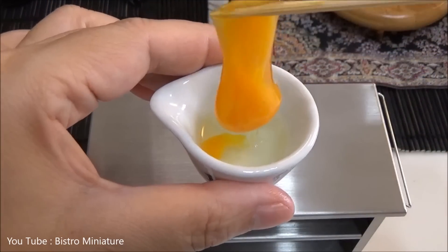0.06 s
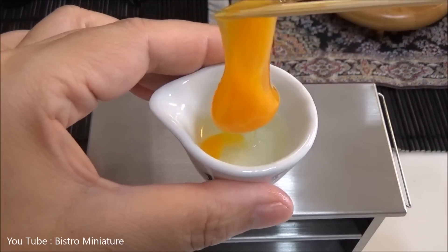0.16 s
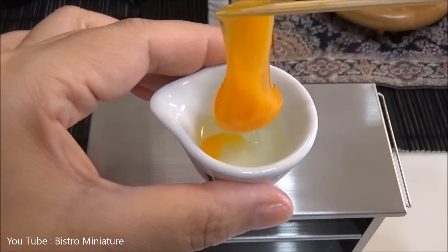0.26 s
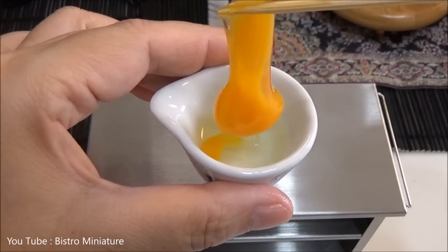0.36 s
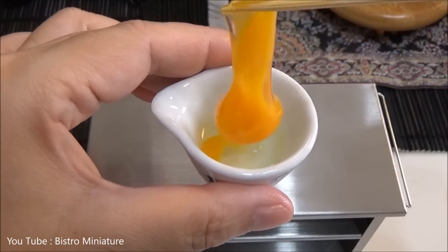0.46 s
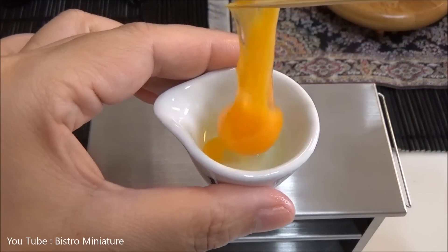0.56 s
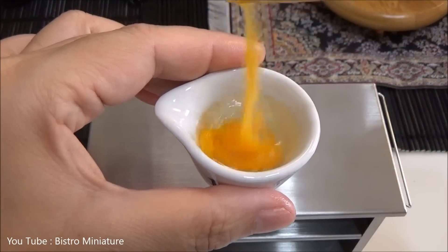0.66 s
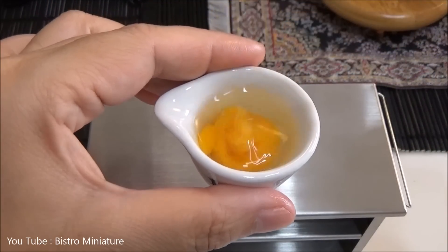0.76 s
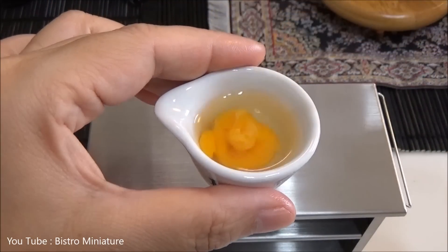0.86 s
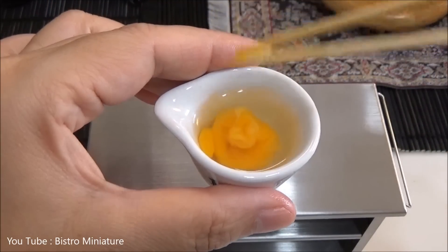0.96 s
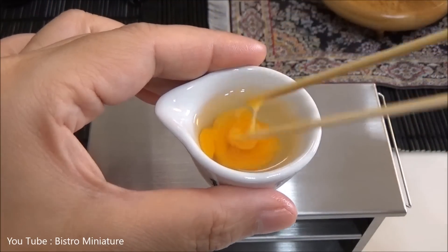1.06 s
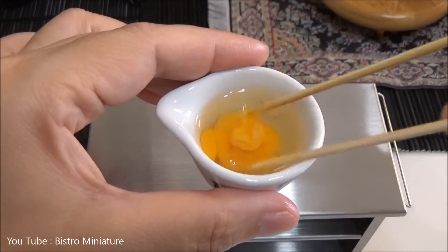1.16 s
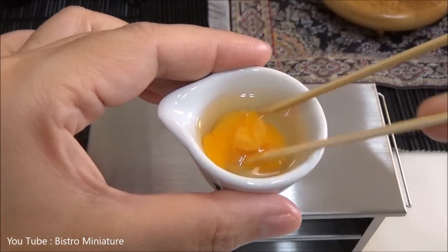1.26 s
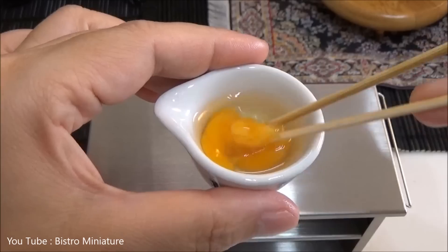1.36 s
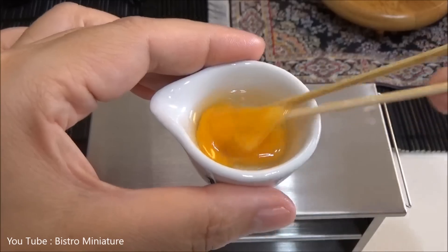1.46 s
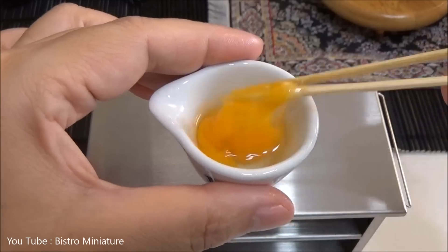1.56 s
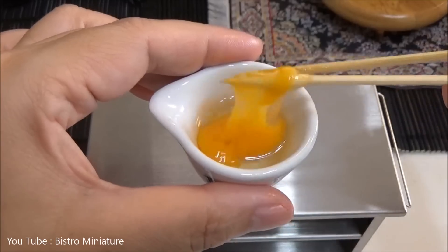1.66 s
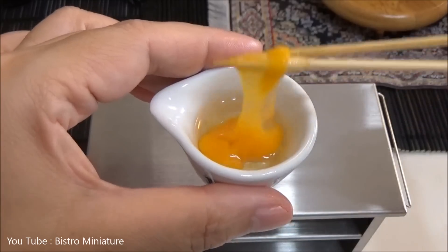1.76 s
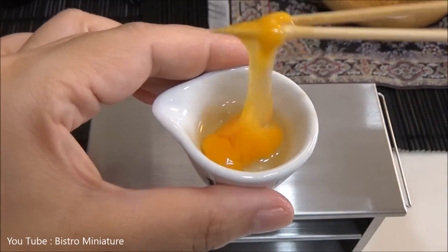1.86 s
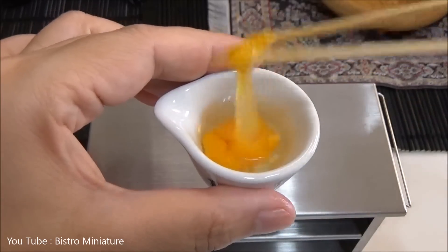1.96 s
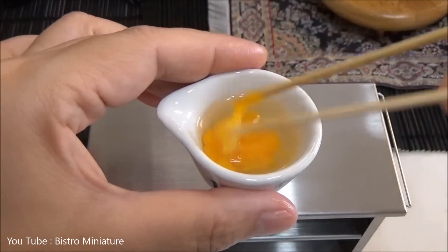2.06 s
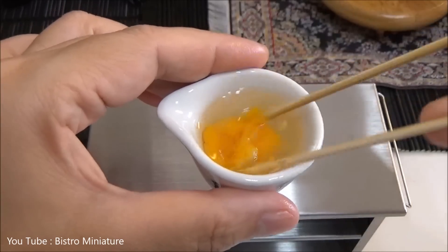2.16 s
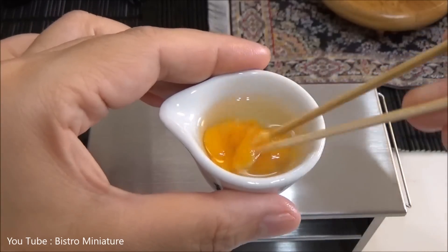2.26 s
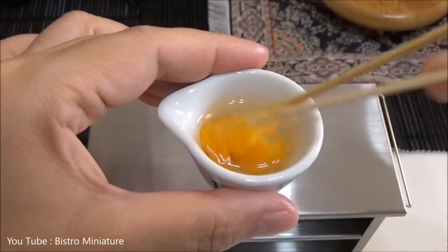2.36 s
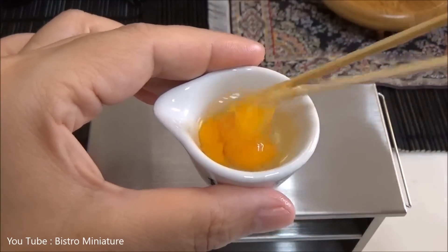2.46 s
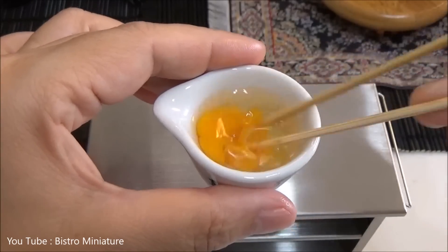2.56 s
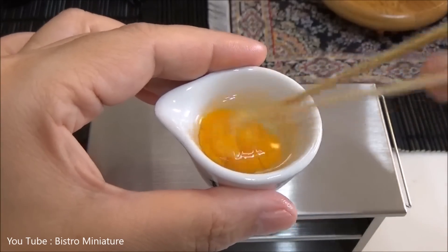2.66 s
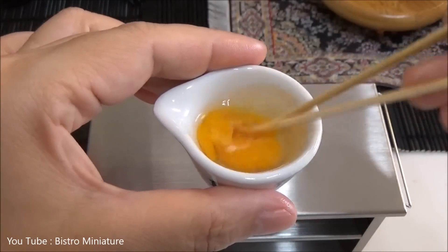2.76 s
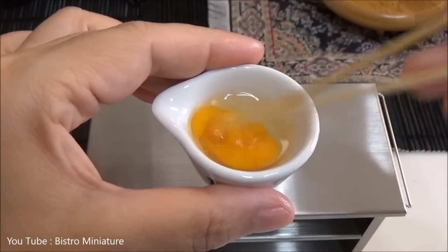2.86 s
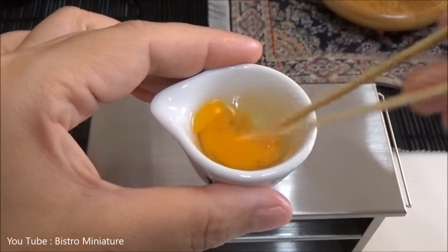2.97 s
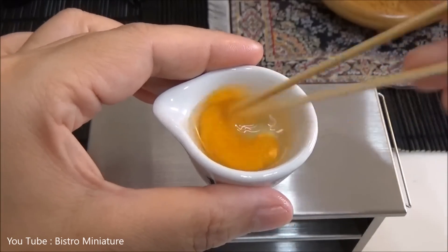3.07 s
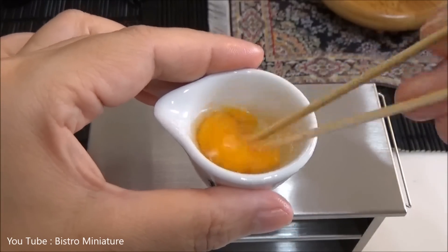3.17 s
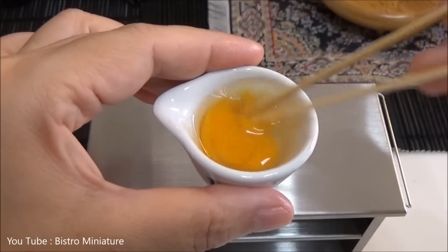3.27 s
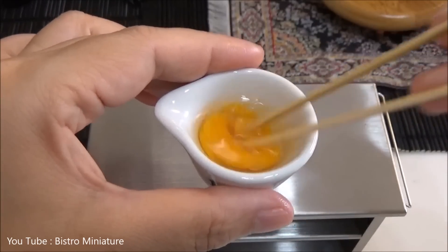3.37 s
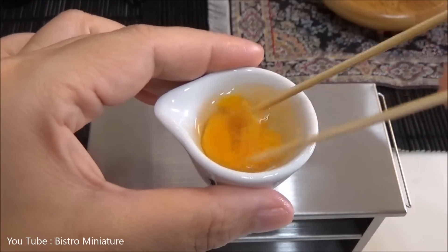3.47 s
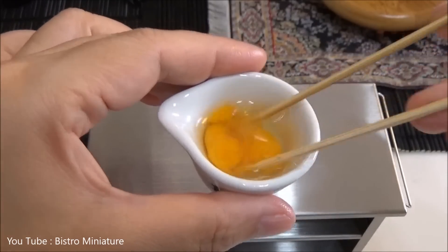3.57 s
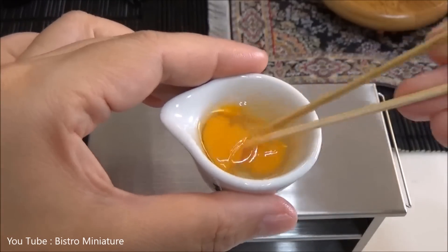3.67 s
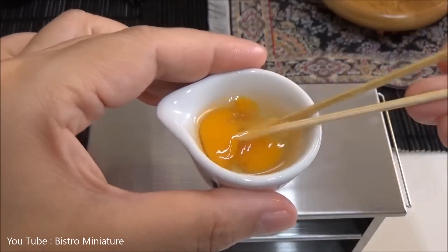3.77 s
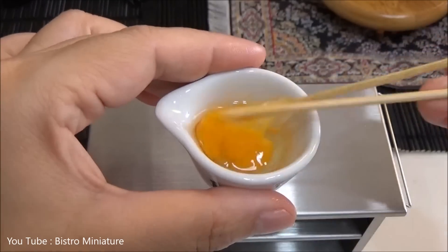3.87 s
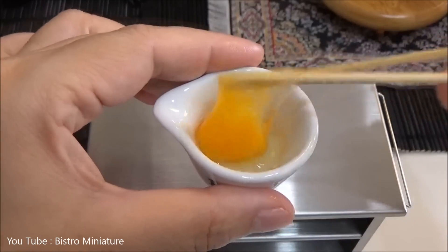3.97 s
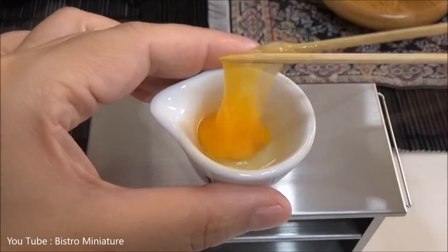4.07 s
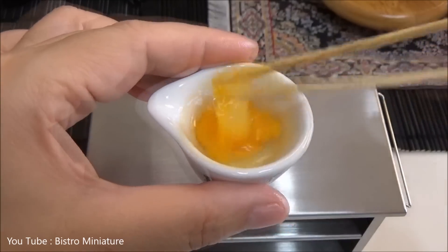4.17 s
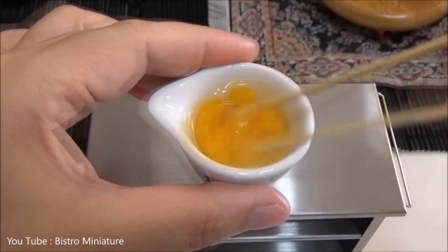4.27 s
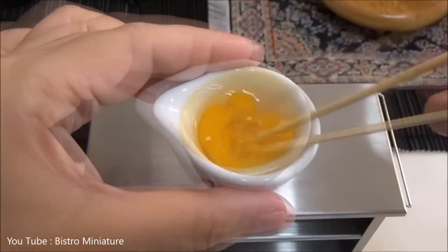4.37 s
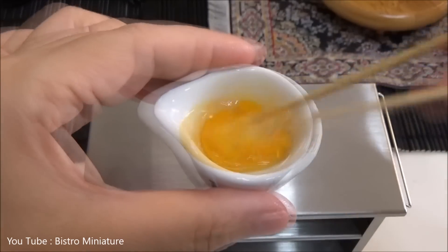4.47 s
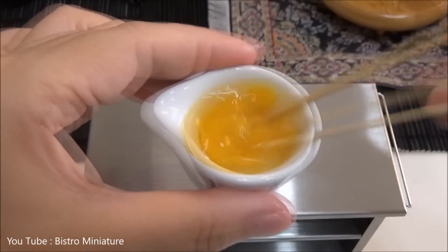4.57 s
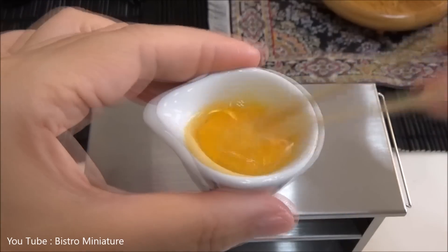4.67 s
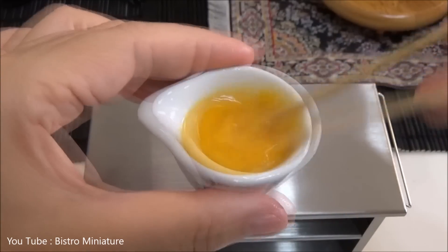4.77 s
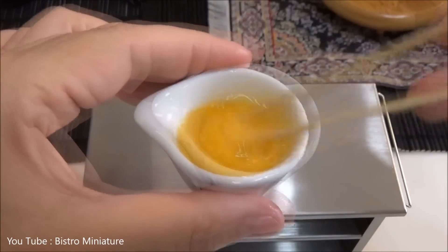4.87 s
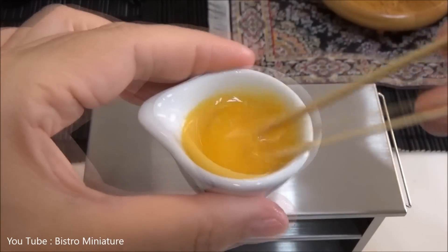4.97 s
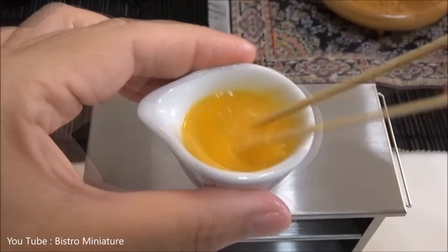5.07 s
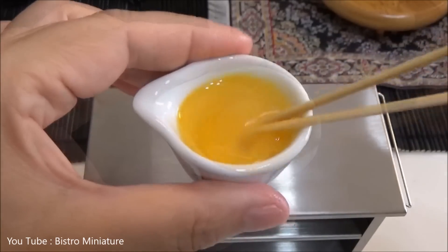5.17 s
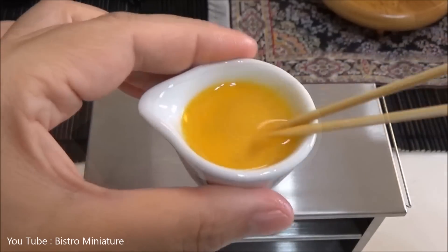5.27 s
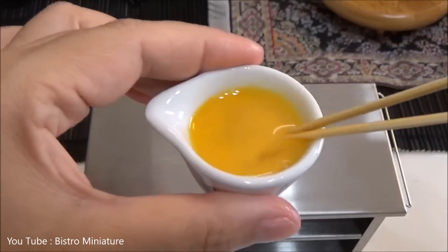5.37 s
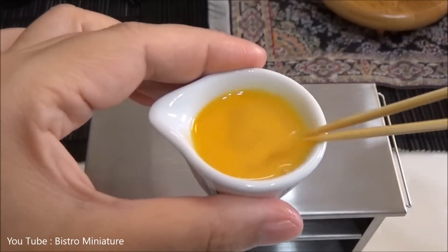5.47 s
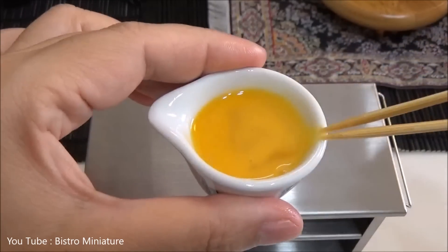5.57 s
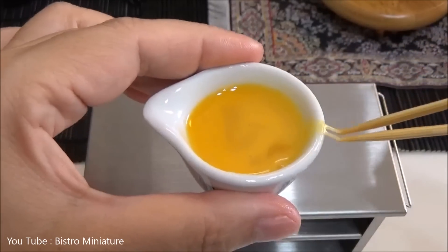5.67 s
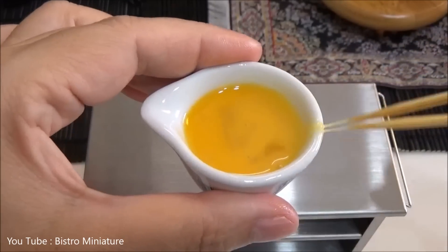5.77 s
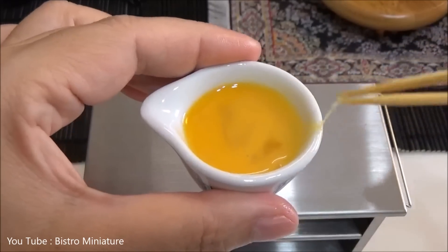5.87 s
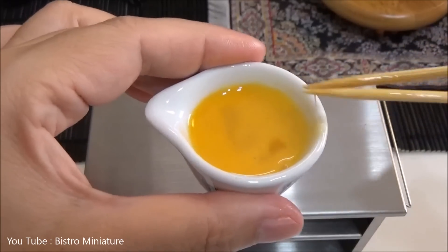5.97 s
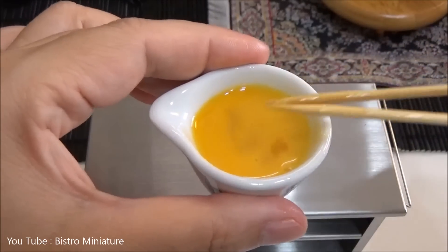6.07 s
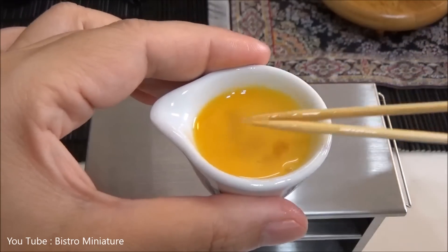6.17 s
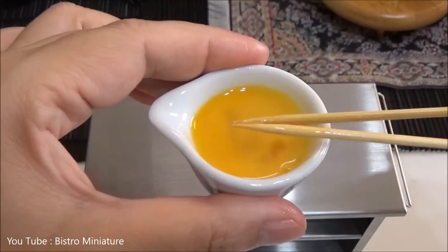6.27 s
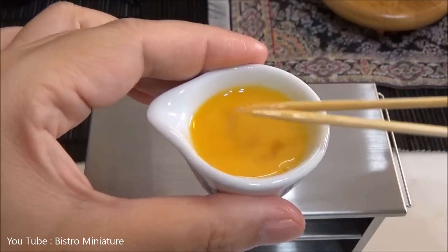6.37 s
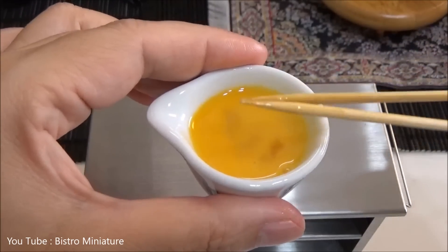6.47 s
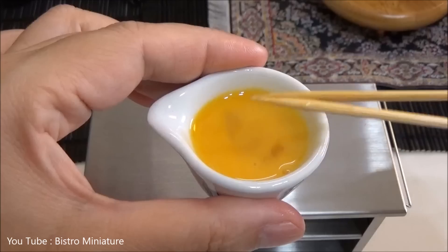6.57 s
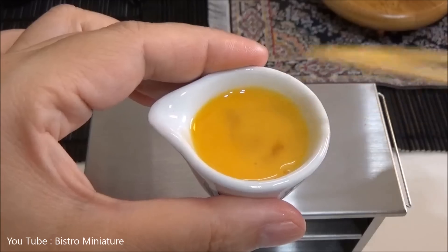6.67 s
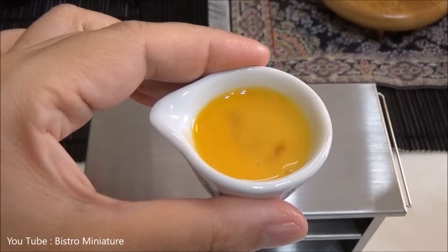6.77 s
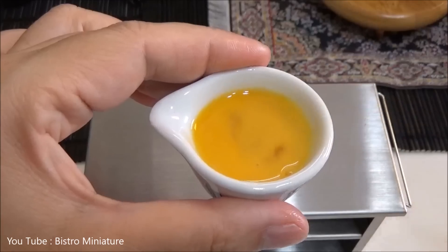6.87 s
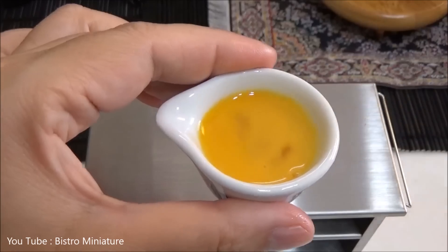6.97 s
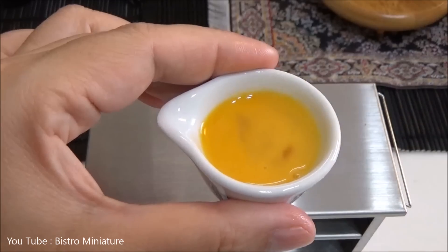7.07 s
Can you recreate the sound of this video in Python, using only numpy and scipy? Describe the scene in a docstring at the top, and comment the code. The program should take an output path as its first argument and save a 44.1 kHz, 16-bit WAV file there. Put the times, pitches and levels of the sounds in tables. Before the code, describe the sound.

A quiet kitchen heard close up, with low wavering rumble, smooth hiss, an unsteady low hum, faint whine and a tiny camera drive ticking about thirty times a second. For the first second there is only this bed. A bright, very short porcelain clink comes near 1.2 s, a faint tick at 1.9 and a strong clink at 2.2. From 2.6 to 3.8 s, small wooden clicks and brief scrapes follow, with a dull bump and short rough hum near 2.8 and clearer clinks around 3.5. At about 4 s the room sound steps up and brisk beating starts: dense, uneven high clinks, woody knocks, scrapes and faint wet crackle, strongest between 4.3 and 5. It thins to a last tap near 5.4. Until 7.1 s only hiss, ticking and rumble remain, with a faint droning murmur of noise and a deep sinking hum after 6.2.

```python
"""Room rumble, a wavering hum, a faint whine, hiss and a camera's small drive, ticking about 30 times a second,
open a quiet kitchen; then two wooden chopsticks beat an egg in a tiny porcelain cup held close.
Taps are decaying modes choked by fingers and egg; scrapes are random slips ringing cup and wood; brisk beating
adds a wet crackle. The walls answer faintly. Rumble and hiss are shaped noise, hums are unsteady sines."""
import sys
import numpy as np
from scipy import signal
from scipy.fft import rfft, irfft, next_fast_len
from scipy.io import wavfile
from scipy.ndimage import uniform_filter1d

SR = 44100
rng = np.random.default_rng(int(sys.argv[2]) if len(sys.argv) > 2 else 0)


def waveform_to_disk(signal):
    """Save audio, clipped to [-1, 1], as 16-bit WAV at the path in sys.argv[1]."""
    frames = np.transpose(np.atleast_2d(signal))
    scaled = np.clip(frames, -1, 1) * 32767
    samples = np.round(scaled).astype(np.int16)
    wavfile.write(sys.argv[1], SR, samples)


N = 314433


def undb(db):
    """Gain of a level in dB."""
    return 10 ** (np.asarray(db) / 20)


def curves(rows):
    """Columns of a table that starts with seconds, read sample by sample."""
    s, *columns = np.transpose(rows)
    return [np.interp(np.arange(N) / SR, s, c) for c in columns]


def on_log(hz, points):
    """A table of Hz and value, read on a log frequency axis."""
    table_hz, values = np.array(points).T
    return np.interp(np.log(hz), np.log(table_hz), values)


def walk(rate):
    """Random levels held 1 / rate s and slewed twice; spread near 1."""
    k = int(SR / rate)
    held = np.repeat(rng.standard_normal(N // k + 1), k)
    return 1.64 * uniform_filter1d(uniform_filter1d(held, k), k)[:N]


def swell(s, length, attack, release):
    """Envelope 0-1 that rises, holds and falls; all arguments in seconds."""
    t = np.arange(N) / SR - s
    return np.clip(np.minimum(t / attack, (length - t) / release), 0, 1)


def brisk_beating():
    """Envelope 0-1 of the spell of brisk beating."""
    return swell(3.972, 1.65, attack=.01, release=.35)


def ring(hz, t60, size=4096):
    """One struck mode: a sine that falls 60 dB in t60 seconds."""
    t = np.arange(size) / SR
    return np.sin(2 * np.pi * hz * t) * 1000. ** (-t / t60)


def add(track, s, sound):
    """Mix a sound into a track at a time in seconds."""
    i = int(s * SR)
    track[..., i:i + sound.shape[-1]] += sound[..., :max(track.shape[-1] - i, 0)]


def unit(x):
    """Scaled to rms 1."""
    return x / np.sqrt(np.mean(x ** 2))


# Stereo width of the noise. Each row: frequency in Hz, side minus mid in dB.
NOISE_WIDTH = [(25, -18), (60, -16), (110, -13.5), (190, -14), (350, -13), (630, -13), (1130, -9.5),
               (2020, -11.5), (3640, -7.5), (6540, -10.5), (11800, -8.5)]
# Stereo tilt of the noise. Each row: frequency in Hz, left minus right in dB.
NOISE_BALANCE = [(60, 0.5), (110, -2.5), (190, 2), (350, -1.5), (630, -2), (1130, 3), (2020, -1.5),
                 (3640, 2), (6540, -1), (11800, 0.0)]


def noise(spectrum, lo_hz, hi_hz):
    """Stereo noise of a given colour inside a band; the side part is its own noise."""
    size = next_fast_len(N)
    hz = np.maximum(np.arange(size // 2 + 1) * SR / size, 1)
    shape = undb(on_log(hz, spectrum)) * (hz >= lo_hz) * (hz < hi_hz)
    mid, side = rfft(rng.standard_normal((2, size))) * shape
    side = side * undb(on_log(hz, NOISE_WIDTH))
    balance = undb(np.outer([.5, -.5], on_log(hz, NOISE_BALANCE)))
    return irfft(np.array([mid + side, mid - side]) * balance, size)[:, :N]


# Colour of the room noise. Each row: frequency in Hz, density in dB per Hz.
ROOM_COLOUR = [(12, -43), (20, -11.5), (85, -9), (119, -5), (150, -5), (192, -2.5), (218, -1), (361, -3.5),
               (401, -8.5), (752, -15), (801, -9.5), (1070, -15.5), (1500, -14), (2280, -20.5),
               (3000, -24.5), (3900, -64.5), (6600, -120)]


def room_bands():
    """Rumble and mid range: third-octave noise bands that waver each on their own."""
    edges = 20 * 2 ** (np.arange(23) / 3)
    return [noise(ROOM_COLOUR, a, b) * undb(walk(3.965)) for a, b in zip(edges, edges[1:])]


# Wandering resonances of the room. Each row: centre in Hz, half width in Hz, mean level in dB against the rumble.
ROOM_RESONANCES = [(187, 18, -14), (233.4, 28, -10), (317.6, 33, -13), (365.6, 34, -10)]


def resonances(upper_db):
    """Narrow noise bands that swell and sink; those above 254 Hz also follow the upper rumble."""
    out = np.zeros((2, N))
    for hz, width, db in ROOM_RESONANCES:
        peak = [(hz - width, -15), (hz, 0), (hz + width, -15)]
        level_db = db + upper_db * (hz > 254) + 2.8 * walk(4.52)
        out = out + undb(level_db) * unit(noise(peak, hz - width, hz + width))
    return out


# Colour of the hiss. Each row: frequency in Hz, density in dB per Hz.
HISS_COLOUR = [(1180, -6), (1950, -4.5), (2180, -21), (2940, -13), (3320, -3), (3640, -6), (6580, -3),
               (7330, -5.5), (10600, -7.5), (11000, -10), (14300, -42), (22000, -120)]
HISS_DB, BRISK_HISS_DB = -67.5, 3.5  # level at rest, extra while the egg is beaten briskly
THIN_HISS_HZ, THIN_HISS_DB = 6290, -14.5  # a narrow streak, level against the main hiss


def hiss():
    """Smooth microphone hiss with one narrow streak, louder during the brisk beating."""
    broad = unit(noise(HISS_COLOUR, 1500, 20000))
    flat = [(1, 0), (2, 0)]
    streak = unit(noise(flat, THIN_HISS_HZ - 120, THIN_HISS_HZ + 120))
    level_db = HISS_DB + BRISK_HISS_DB * brisk_beating()
    return undb(level_db) * (broad + undb(THIN_HISS_DB) * streak)


# Course of the room sound, which steps up near 4 s. Each row: time in seconds, rumble level in dB,
# boost of its 254-508 Hz part in dB, boost of its part under 80 Hz in dB, mid range level in dB,
# mean drone level in dB, left minus right in dB.
ROOM_COURSE = [(0.0, -58, -3, 0.1, -66, -88, -0.16), (.7, -60, -0.5, -1.5, -67, -85, 1.2),
               (1.2, -61, 0, 2, -68.5, -89, 0.62), (1.8, -62.5, 2.5, 0.1, -68, -79, -0.68),
               (2.4, -62.5, 3.5, 0, -69, -74.5, 1.2), (2.75, -61, 0.1, -1, -67.5, -76, 2.1),
               (3.2, -61, 0.4, -0.2, -67.5, -79, 0.78), (3.96, -63, 0.5, 1.5, -69, -86, 0.41),
               (3.98, -53.5, 0.7, -4, -62, -68, 0.0099), (4.3, -58, 1.9, -0.5, -61.5, -75, .3),
               (5.0, -57, -1.5, 4.5, -62, -72, -0.57), (5.56, -60.5, 2, 0.4, -65, -71.5, -.1),
               (5.7, -58, 0.2, -3, -66, -63.5, .1), (5.88, -60, -0.7, 0.1, -66, -66.5, 0.31),
               (6.06, -58.5, 1.5, -0.5, -63.5, -65.5, 1.2), (6.25, -61.5, 0, 0.8, -64, -69, 1.4),
               (6.6, -59.5, 0, 1, -64, -72.5, 1.4), (7.13, -60.5, -3, -3, -65, -70.5, 1.5)]
# Colour of the drone. Each row: frequency in Hz, density in dB per Hz.
DRONE_COLOUR = [(700, -21), (785, -6.5), (820, 3), (860, -5), (925, -12.5), (990, -23.5), (1200, -22),
                (1290, -6), (1380, -24.5), (1700, -15), (2000, -26.5)]
SLOSH_DB, DRONE_FLICKER_DB = 2, 1.5  # boost above 1.6 kHz in brisk beating, spread of the drone level


def background():
    """Wavering rumble and mid range, narrow swells, a flickering noise drone, and hiss."""
    rumble_db, upper_db, deep_db, mid_db, drone_db, pan_db = curves(ROOM_COURSE)
    bands = room_bands()
    deep = undb(deep_db) * sum(bands[:6])
    upper = undb(upper_db) * sum(bands[11:14])
    rumble = unit(deep + sum(bands[6:11]) + upper)
    slosh = undb(SLOSH_DB * brisk_beating()) * sum(bands[19:])
    mids = unit(sum(bands[14:19]) + slosh)
    drone = unit(noise(DRONE_COLOUR, 600, 2100)) * undb(DRONE_FLICKER_DB * walk(14))
    room = undb(rumble_db) * (rumble + resonances(upper_db))
    room = room + undb(mid_db) * mids + undb(drone_db) * drone
    return room * undb(np.array([pan_db, -pan_db]) / 2) + hiss()


# Swells of the hum. Each row: start in seconds, length in seconds, added level in dB.
HUM_RISES = [(0.287, 0.11, -60), (1.178, 0.6, -69), (2.114, 0.61, -66.5), (2.75, 0.22, -72),
             (3.036, 0.37, -72), (3.9, 0.45, -72), (4.636, 0.99, -72.5), (6.249, 0.35, -76)]
HUM_HZ, HUM_DB, HUM_FADE_S, HUM_FLICKER_DB = 120.3, -80.5, 0.088, 1.5


def wavering_hum():
    """A low sine, unsteady in level and phase, that swells now and then."""
    t = np.arange(N) / SR
    size = undb(HUM_DB)
    for s, length, db in HUM_RISES:
        size = size + undb(db) * swell(s, length, HUM_FADE_S, HUM_FADE_S)
    flicker = undb(HUM_FLICKER_DB * walk(14))
    return np.sqrt(2) * size * flicker * np.sin(2 * np.pi * HUM_HZ * t + .9 * walk(18))


# Thin whining lines. Each row: frequency in Hz, mean peak level in dB.
WHINE_LINES = [(60, -83), (1029, -85.5), (1157, -81.5), (1286, -85.5), (1543, -81.5)]


def whine():
    """Faint thin sines that waver slowly in level and phase."""
    t = np.arange(N) / SR
    return sum(undb(db + 1.5 * walk(2.7)) * np.sin(2 * np.pi * hz * t + walk(6.6)) for hz, db in WHINE_LINES)


# Colour of the dull bump. Each row: frequency in Hz, density in dB per Hz.
BUMP_TONE = [(80, -5), (130, 1), (300, 2), (550, -2), (900, -13)]


def bump():
    """A dull knock of low noise that starts the short hum."""
    return undb(-54) * swell(2.824, .075, attack=.008, release=.045) * unit(noise(BUMP_TONE, 73, 920))


def tone(s, length, attack, release, db, hz, glide):
    """Size and phase of a sine that swells once while its pitch glides (Hz per s)."""
    t = np.arange(N) / SR - s
    size = np.sqrt(2) * undb(db) * swell(s, length, attack, release)
    return size, 2 * np.pi * (hz + glide * t / 2) * t


def short_hum():
    """A short rough hum: a jittery rising sine over a weaker one at a third of its pitch."""
    size, phase = tone(2.849, .089, attack=.005, release=.018, db=-50, hz=310, glide=27)
    main = undb(walk(81)) * np.sin(phase + .4 * walk(45))
    return size * (main + 0.26 * np.sin(phase / 3 + .6 * walk(30)))


def deep_hum():
    """A deep hum late on: one unsteady sine that sinks in pitch."""
    size, phase = tone(6.2, .87, attack=.3, release=.12, db=-67, hz=37, glide=-10)
    return size * np.sin(phase + .6 * walk(19))


# Modes of the drive. Each row: frequency in Hz, t60 in seconds, level in dB on even steps, level in dB on odd steps.
DRIVE_MODES = [(2635, .022, -63, -73), (3185, .03, -66, -61.5), (3365, .022, -59, -63)]
# Spells of ticking. Each row: first step in seconds, end in seconds.
DRIVE_SPELLS = [(.0005, 3.97), (4.014, 7.13)]
DRIVE_STEP_S, DRIVE_SCATTER_DB = 1.001 / 30, 1.2


def drive():
    """A step forth and a step back in turn push the same small parts in opposite directions."""
    out = np.zeros(N)
    soft = 1 - np.exp(-np.arange(2048) / SR / 0.001)
    forth = soft * sum(undb(even_db) * ring(hz, t60, 2048) for hz, t60, even_db, odd_db in DRIVE_MODES)
    back = -soft * sum(undb(odd_db) * ring(hz, t60, 2048) for hz, t60, even_db, odd_db in DRIVE_MODES)
    scatter_db = DRIVE_SCATTER_DB * rng.standard_normal((2, 200))
    for (first, end), scatter in zip(DRIVE_SPELLS, scatter_db):
        for k, s in enumerate(np.arange(first, end, DRIVE_STEP_S)):
            add(out, s, undb(scatter[k]) * (back if k % 2 else forth))
    return out


# Modes of the porcelain cup. Each row: multiple of the main ring, nominal level in dB, share of the ring's t60.
CUP_MODES = [(.79, -19.5, 0.31), (.905, -13, 0.43), (1, -3.5, 1), (1.04, -17, 0.39), (1.115, -17, 0.7)]
RING_T60_S, CHOKE_POWER, CUP_RISE_S = 0.025, 1.8, 0.0004
MODE_SCATTER, MODE_SCATTER_DB = 0.016, 3.0  # each blow lands on a new spot: side modes shift and change strength
CONTACT_S = 0.0003


def cup_ring(cup_hz, held_ms, grit):
    """The cup's modes, choked as the egg closes over the wall; modes above the main one swing against it."""
    t = np.arange(1024) / SR
    out = np.zeros(1024)
    for i, (multiple, db, share) in enumerate(CUP_MODES):
        is_side = multiple != 1
        sign = -1 if multiple > 1 else 1
        level_db = db + MODE_SCATTER_DB * is_side * grit[i + 8]
        hz = (multiple + MODE_SCATTER * is_side * grit[i + 16]) * cup_hz
        out = out + sign * undb(level_db) * ring(hz, share * RING_T60_S, size=1024)
    choke = np.exp(-(1000 * t / held_ms) ** CHOKE_POWER)
    return np.minimum(t / CUP_RISE_S, 1) * out * choke


CUP_SETTLES_HZ, SETTLE_SHARE = 9600, .5  # with the stick gone, the ring sits part of the way to the free pitch
LINGER_T60_S, LINGER_SPLIT_HZ = 0.062, 59  # decay, mean split of the pair


def lingering_ring(cup_hz, grit):
    """A little of the main mode rings on after the choke, as a beating pair that fades in."""
    free_hz = cup_hz + SETTLE_SHARE * (CUP_SETTLES_HZ - cup_hz)
    split_hz = LINGER_SPLIT_HZ * (0.99 + grit[1])
    pair = ring(free_hz, LINGER_T60_S) + .45 * ring(free_hz + split_hz, LINGER_T60_S)
    return pair * (1 - np.exp(-np.arange(4096) / SR / 0.0017))


KNOCK_T60_S, THUD_T60_S, RATTLE_S = 0.0074, 0.015, 0.0015  # the rattle time is to 1/e
STICK_HZ, STICK_DB = 7080, -8  # mean pitch and level of a bending mode that sounds in every knock
CRACK_DB, CRACK_LOW_HZ = -2.5, 5870
SNAP_HZ, SNAP_DB = (1100, 4600), 6  # the broad snap in the thud: band, gain


def stick_blow(knock_hz, knock_db, thud_hz, thud_db, grit):
    """Wood on glaze: a knock of two bending modes with a noise crack, and a dull thud with a broad snap."""
    t = np.arange(1024) / SR
    edge = signal.butter(5, CRACK_LOW_HZ, "high", fs=SR, output="sos")
    body = signal.butter(2, SNAP_HZ, "band", fs=SR, output="sos")
    rise = np.sin(np.pi / 2 * np.minimum(t / CONTACT_S, 1)) ** 2  # the push builds up while wood meets glaze
    rattle = np.pad(grit, (0, 896)) * np.exp(-t / RATTLE_S)
    bending = undb(STICK_DB) * ring(STICK_HZ * (1 + 0.085 * grit[2]), KNOCK_T60_S, size=1024)
    knock = rise * (0.82 * ring(knock_hz, KNOCK_T60_S, size=1024) + bending)
    knock = knock + undb(CRACK_DB) * signal.sosfilt(edge, rattle)
    thud = 0.58 * rise * ring(thud_hz, THUD_T60_S, size=1024)
    thud = thud + undb(SNAP_DB) * signal.sosfilt(body, rattle)
    return undb(knock_db) * knock + undb(thud_db) * thud


# Blows on the cup. Each row: start in seconds, nominal cup level in dB, cup ring in Hz, choke time in milliseconds,
# lingering ring in dB against the cup, stick knock in Hz, nominal knock level in dB, dull thud in Hz,
# nominal thud level in dB.
TAP_BLOWS = [(1.183, -24, 9940, 4.9, -29, 6370, -40.5, 3430, -68),
             (1.8944, -52, 9800, 1.1, -26, 7380, -52, 1910, -75),
             (2.1927, -9.5, 9920, 4.6, -30.5, 6350, -38, 3210, -54.5),
             (2.5891, -45, 10390, 1.1, -26, 6830, -51, 3350, -54),
             (2.794, -44, 9400, 1.1, -26, 6980, -42.5, 3230, -49.5),
             (2.9806, -49, 9630, 2.3, -26, 6500, -42.5, 4370, -52),
             (3.149, -66, 9890, 1.3, -28, 6370, -54, 2100, -52),
             (3.3109, -48, 9860, 1.3, -26, 5680, -37, 2060, -51),
             (3.3143, -40, 9580, 3, -26, 6940, -35.5, 3550, -50),
             (3.5178, -21, 9880, 5.5, -24, 6160, -31.5, 3730, -64),
             (3.5425, -34.5, 9920, 4.5, -32, 5700, -37.5, 4350, -48),
             (3.559, -38, 9900, 9, -15, 7000, -58, 3190, -64),
             (3.7663, -34.5, 9680, 10, -22, 6320, -34.5, 3460, -46),
             (3.9819, -34, 9760, 2.6, -21, 5500, -29.5, 4690, -47),
             (4.0208, -47, 9610, 3.7, -26, 6180, -54, 1910, -70),
             (4.0498, -62, 9540, 3, -26, 6970, -50, 1910, -66),
             (4.0608, -49, 9870, 1.3, -26, 7460, -49, 2490, -65),
             (4.071, -42, 9770, 1.3, -26, 5730, -39.5, 3380, -55),
             (4.1166, -41, 10480, 2.2, -26, 6300, -35.5, 2050, -46),
             (4.175, -47, 9690, 5, -26, 6240, -37, 2450, -50),
             (4.183, -24.5, 9500, 2.4, -36, 5100, -29, 3990, -43),
             (4.202, -46, 9730, 5, -26, 6990, -40, 4690, -57.5),
             (4.2173, -34.5, 9540, 2.5, -32, 5210, -49, 2350, -59),
             (4.2493, -42.5, 9690, 2.4, -26, 7020, -51, 1910, -64),
             (4.3044, -11.5, 9920, 7.1, -24, 6430, -27.5, 3990, -42.5),
             (4.383, -21.5, 9480, 4, -28.5, 7040, -22.5, 4270, -46.5),
             (4.3959, -38.5, 9520, 2.6, -27, 7030, -48.5, 4060, -53.5),
             (4.4359, -21.5, 9740, 3, -30.5, 7360, -42, 3520, -49),
             (4.539, -53, 9670, 2.2, -26.5, 7280, -46.5, 3330, -56),
             (4.566, -27.5, 9390, 4, -25, 7500, -27, 3430, -43.5),
             (4.5798, -5.5, 9730, 3.5, -28.5, 6960, -31, 2000, -40),
             (4.7227, -66, 9900, 2.6, -26, 6750, -34.5, 2730, -55),
             (4.7619, -22.5, 9500, 3.6, -34, 6640, -30, 3330, -51),
             (4.7906, -48, 9940, 2.2, -26, 6330, -45, 1910, -63),
             (4.8007, -44, 9570, 6, -26, 6990, -40, 2020, -49.5),
             (4.804, -45, 9740, 6, -26, 7500, -39, 3330, -55),
             (4.829, -51, 9600, 2.8, -26, 6770, -43, 4690, -55),
             (4.9395, -12, 9450, 4.2, -38, 7390, -21.5, 3530, -41.5),
             (4.963, -21.5, 9370, 3, -30, 6800, -31, 3450, -49),
             (4.967, -45, 9200, 2.9, -26, 5350, -46, 3440, -46),
             (5.162, -39, 10100, 2.2, -24, 6600, -46, 3390, -50),
             (5.1855, -24, 9600, 4.5, -30, 6500, -28.5, 2630, -54),
             (5.344, -28, 9300, 2.2, -28, 6780, -28.5, 2090, -62),
             (5.3813, -20, 9570, 3.1, -33, 7100, -33.5, 3310, -55)]
SMALL_CUP_HZ = 6500
STICK_PAN_DB, STICK_PAN_SCATTER_DB = -1, 7  # left minus right: from the right on average, each blow a new spot
LINGER_FLUTTER_DB, LINGER_FLUTTER_RATE = 2.5, 280  # spread, steps per s


def taps():
    """Each tap: choked cup, lingering ring fluttering with the moving egg (both mono), and stick (stereo)."""
    cup, lingering, sticks = np.zeros(N), np.zeros(N), np.zeros((2, N))
    chance = rng.uniform(-1, 1, (len(TAP_BLOWS), 128))  # a little noise of its own for each blow
    # so small a cup radiates little below its ring
    small = signal.butter(4, SMALL_CUP_HZ, "high", fs=SR, output="sos")
    for row, grit in zip(TAP_BLOWS, chance):
        s, db, cup_hz, held_ms, linger_db, knock_hz, knock_db, thud_hz, thud_db = row
        add(cup, s, undb(db) * signal.sosfilt(small, cup_ring(cup_hz, held_ms, grit)))
        add(lingering, s, undb(db + linger_db) * lingering_ring(cup_hz, grit))
        pan_db = STICK_PAN_DB + STICK_PAN_SCATTER_DB * grit[0]
        pan = undb(pan_db * np.array([[.5], [-.5]]))
        add(sticks, s, pan * stick_blow(knock_hz, knock_db, thud_hz, thud_db, grit))
    flutter = undb(LINGER_FLUTTER_DB * walk(LINGER_FLUTTER_RATE))
    return cup + lingering * flutter, sticks


PORT_LAG_S = 3.5e-6


def close_by(x):
    """The cup sits almost in front of two microphone ports: the right one hears it microseconds earlier."""
    side = np.gradient(x) * SR * PORT_LAG_S / 2
    return np.array([x - side, x + side])


# Scattered echoes off the walls, early and late part. Each row: level in dB, t60 in seconds.
WALL_ECHOES = [(-22, 0.1), (-27.5, 0.23)]
COUNTER_ECHO_S, COUNTER_ECHO_DB = .0038, -24


def walls(x):
    """One echo off the counter, then scattered echoes that thicken into a tail, partly different left and right."""
    t = np.arange(int(.4 * SR)) / SR
    hits = (rng.random((3, len(t))) < .02 + 4 * t) * (t > .006)
    echoes = rng.standard_normal((3, len(t))) * hits
    echoes = echoes[0] + 0.28 * echoes[1:]  # shared part plus each side's own
    tail = np.zeros((2, len(t)))
    for db, t60 in WALL_ECHOES:
        part = echoes * 1000. ** (-t / t60)
        tail = tail + undb(db) * part / np.sqrt(np.sum(part ** 2) / 2)
    tail[:, int(COUNTER_ECHO_S * SR)] = undb(COUNTER_ECHO_DB)
    return signal.fftconvolve(x[None], tail, axes=1)[:, :N]


# Sticks dragged along the wall. Each row: start in seconds, length in seconds, nominal level in dB,
# share of the cup ring from 0 to 1.
DRAGS = [(2.981, 0.01, -48, 0.33), (3.141, 0.047, -63, 0.37), (3.312, 0.032, -61, 0.4),
         (3.517, 0.042, -57, 0.85), (3.979, 0.02, -48, 0.42), (4.013, 0.071, -63, 0.5),
         (4.2, .06, -59, 0.55), (4.31, .065, -61, 0.5), (4.393, 0.034, -53, 0.6), (4.573, 0.053, -49, 0.84),
         (4.77, 0.033, -63, 0.2), (4.8, 0.033, -51.5, 0.7), (4.966, 0.049, -64, 0.16),
         (5.172, 0.024, -52, 0.5), (5.322, 0.054, -64, 0.6)]
SCRAPE_RING_HZ, SCRAPE_WOOD_HZ, SCRAPE_RATE = 9720, 7030, 2500  # the rate is mean slips per s


def scrapes():
    """Stick and slip: uneven tiny blows into the cup ring and the wood."""
    struck = rng.random(N) < SCRAPE_RATE / SR
    slips = struck * undb(.4 * rng.exponential(size=N)) * rng.standard_normal(N)
    cup = unit(signal.fftconvolve(slips, ring(SCRAPE_RING_HZ, 0.0083, size=1024))[:N])
    wood = unit(signal.fftconvolve(slips, ring(SCRAPE_WOOD_HZ, 0.00396, size=1024))[:N])
    out = np.zeros(N)
    for s, length, db, share in DRAGS:
        drag = swell(s, length, attack=0.0053, release=.0078)
        out = out + undb(db) * drag * (share * cup + (1 - share) * wood)
    return out


WET_RATE, WET_HZ, WET_DB = 900, 6570, -73  # mean ticks per s, lower ring of a tick, rms level at full swell


def wet_ticks():
    """A dense crackle of short soft ticks of uneven size while the egg is beaten briskly."""
    ticks = (rng.random(N) < WET_RATE / SR) * rng.standard_normal(N)
    grain = ring(WET_HZ, 0.0024, size=256) + .6 * ring(1.42 * WET_HZ, .004, size=256)
    grain = grain * np.minimum(np.arange(256) / SR / CONTACT_S, 1)
    return undb(WET_DB) * brisk_beating() * unit(signal.fftconvolve(ticks, grain)[:N])


def scene():
    """Background, hums and drive under the cup, the sticks and the walls' answer."""
    bed = background() + wavering_hum() + whine() + bump() + short_hum() + deep_hum() + drive()
    cup, sticks = taps()
    cup = cup + scrapes() + wet_ticks()
    return bed + close_by(cup) + sticks + walls(cup + sticks.mean(axis=0))


TOP_HZ, SKIRT_HZ, SKIRT_DB = 11060, 12350, -21.5


def record(dry):
    """A steep symmetric low-pass cuts the top, leaving a faint skirt that a second low-pass ends."""
    steep = signal.firwin(401, TOP_HZ, window=("kaiser", 3), fs=SR)
    cut = signal.fftconvolve(dry, steep[None], "same", axes=1)
    leak = undb(SKIRT_DB) * (dry - cut)
    return cut + signal.sosfiltfilt(signal.butter(4, SKIRT_HZ, fs=SR, output="sos"), leak)


dry = scene()
out = record(dry)
waveform_to_disk(out)
```